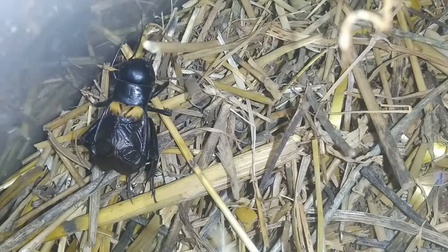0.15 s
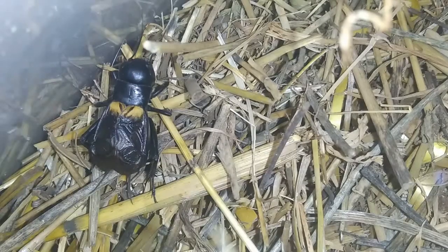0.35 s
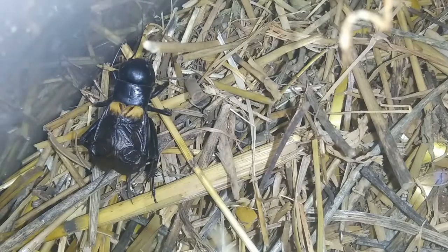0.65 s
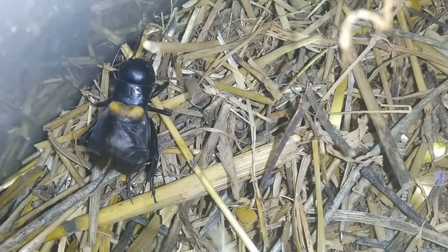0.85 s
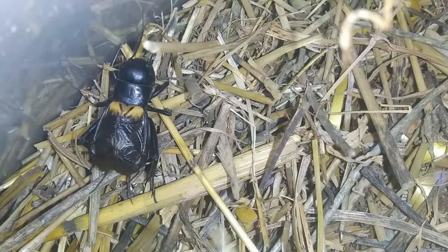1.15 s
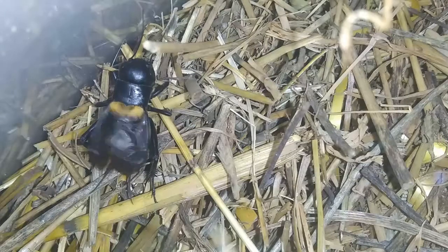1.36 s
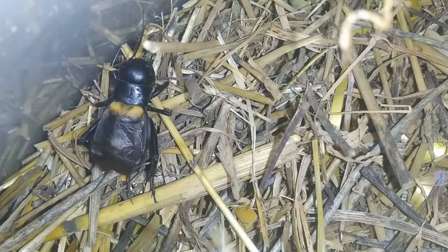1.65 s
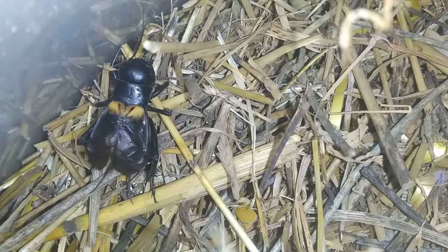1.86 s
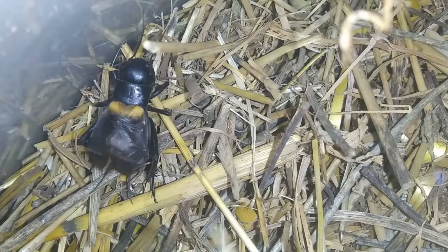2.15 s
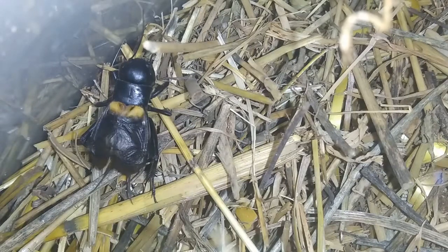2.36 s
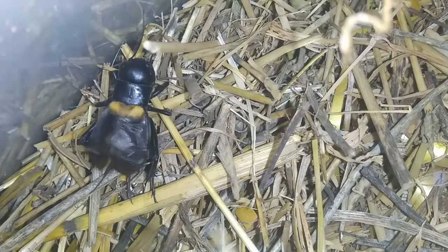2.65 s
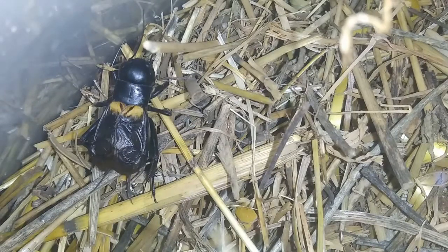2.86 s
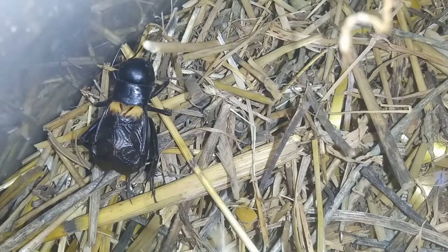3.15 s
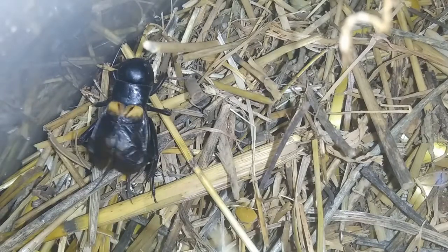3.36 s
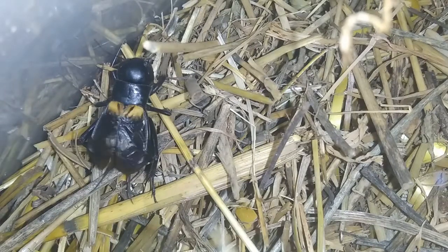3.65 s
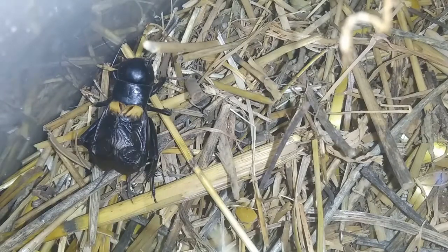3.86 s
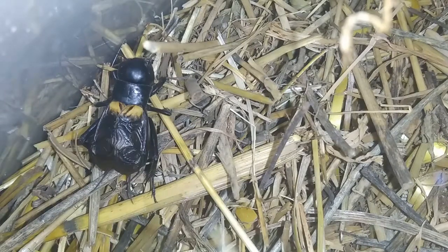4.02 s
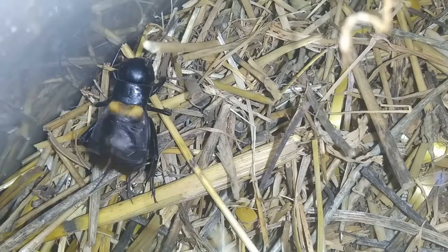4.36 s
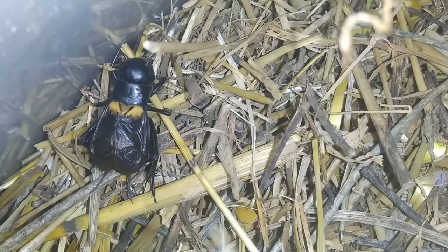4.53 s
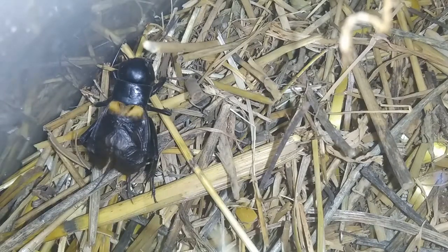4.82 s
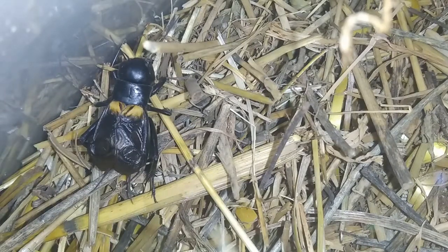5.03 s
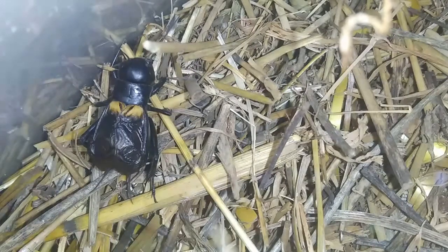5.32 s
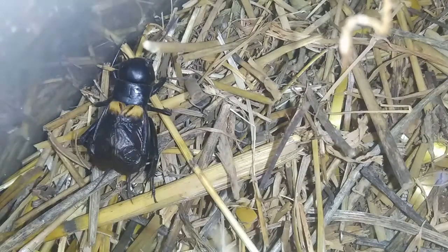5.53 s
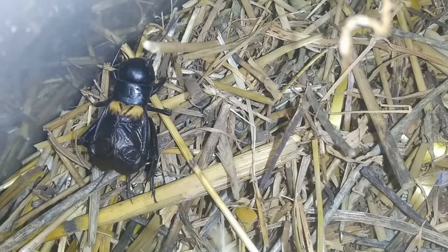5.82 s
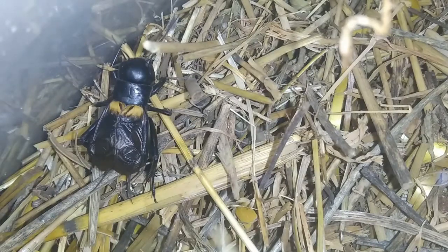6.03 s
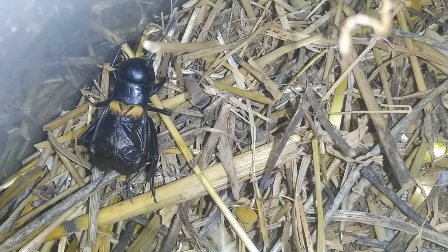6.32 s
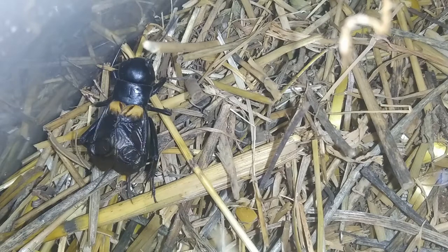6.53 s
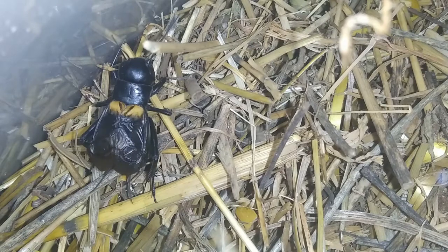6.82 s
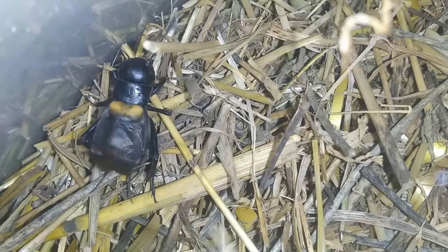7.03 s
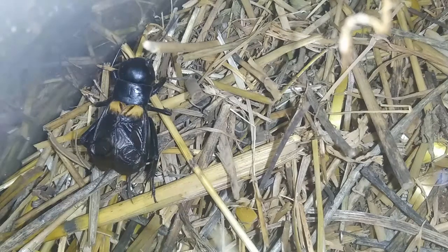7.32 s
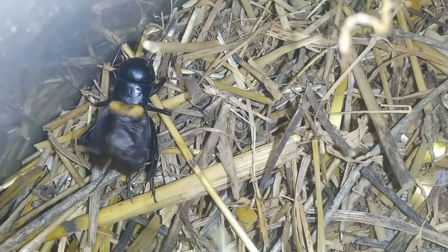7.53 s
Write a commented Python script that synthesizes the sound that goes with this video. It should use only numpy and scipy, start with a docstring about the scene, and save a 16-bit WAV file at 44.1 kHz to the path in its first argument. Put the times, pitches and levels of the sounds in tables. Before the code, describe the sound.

Shrill, close cricket chirps repeat steadily, about four a second, in a small enclosed space, faltering briefly before carrying on.

```python
"""Field cricket in a straw-lined tub

A cricket stridulates a hand's width from a phone with two microphone ports. In each chirp the wings
flick open, touch lightly, then close two or three times. At each closing a scraper crosses a toothed
file and drives the wing at resonance: a loud falling whistle whose pitch and length follow its force.
Faint dull noise swells with each chirp, straw ticks now and then, and the room answers briefly.
The near port overloads, and a fast limiter flattens the strokes."""
import sys
import numpy as np
from scipy import signal
from scipy.fft import rfft, irfft
from scipy.io import wavfile
from scipy.ndimage import uniform_filter1d

SR = 44100
rng = np.random.default_rng(int(sys.argv[2]) if len(sys.argv) > 2 else 0)


def write(x):
    x = np.atleast_2d(x).T
    wavfile.write(sys.argv[1], SR, np.round(np.clip(x, -1, 1) * 32767).astype(np.int16))

N = 338688


def undb(db):
    """Decibels as an amplitude ratio."""
    return 10 ** (np.asarray(db) / 20)


def add(track, s, sound):
    """Superposition: a sound adds to a track from s seconds on."""
    start = max(int(s * SR), 0)
    part = sound[..., :max(N - start, 0)]
    track[..., start:start + part.shape[-1]] += part


def noise(points):
    """Spectral shaping: two independent noises of rms 1, coloured by (Hz, dB) points."""
    hz, db = np.transpose(points)
    bins = np.maximum(np.arange(N // 2 + 1) * SR / N, 1)
    gain = undb(np.interp(np.log(bins), np.log(hz), db))
    shaped = irfft(rfft(rng.standard_normal((2, N))) * gain, N)
    return shaped / shaped.std()


def wobble(t, rate):
    """Random modulation: values drawn rate times a second and joined by lines."""
    return np.interp(t * rate, np.arange(256), rng.standard_normal(256))


def band(x, low_hz, high_hz):
    """Zero-phase filtering: a steep band-pass run forwards and backwards."""
    return signal.sosfiltfilt(signal.butter(4, [low_hz, high_hz + 1], "band", fs=SR, output="sos"), x)


def ports(left_db):
    """Level difference between the two ports; the right one faces the cricket."""
    return np.array([[undb(left_db)], [1]])


# Spectrum of wing rubbing on wing, teeth out of step. Each row: frequency in Hz, relative level in dB.
SCRAPE_SPECTRUM = [(1000, -35), (2900, -43.5), (3700, -18.5), (4500, -2.5), (5200, 3.5), (6300, -10.5),
                   (7200, -6), (8100, -24), (9500, -22), (12000, -19.5), (15500, -43)]
# The song. Each row, one chirp: start, run-up to the first full stroke and wing period in seconds;
# number of full strokes; relative levels in dB of the first stroke, the last stroke, the first touch,
# the first stroke's scrape and the later strokes' scrape.
CHIRPS = [(.022, .049, .0338, 2, .2, .6, -4.4, -24, -39), (.342, .0383, .0343, 2, .3, -.2, -8.5, -41, -32),
          (.600, .0435, .036, 2, 1, 3.1, -5.5, -34, -42), (.915, .041, .0365, 2, 1.3, 3.3, -30, -44, -30),
          (1.128, .046, .0423, 2, 1.2, 3.3, -3.5, -32, -39),
          (1.425, .043, .035, 2, 1.2, 3.3, -25, -30, -30),
          (1.675, .0423, .038, 2, 1.4, 3.2, -5.5, -37, -33),
          (1.948, .0417, .038, 2, 1.7, 3.6, -28, -47, -25), (2.199, .044, .0373, 2, .3, 4.5, -6, -28, -37),
          (2.482, .0407, .0354, 2, 1.7, 3.5, -32, -44, -24),
          (2.726, .0453, .0332, 3, 2.3, 5.8, -24, -29, -25),
          (3.115, .039, .0313, 2, -1.5, 0, -28, -44, -31), (3.453, .0413, .0337, 2, -1, .6, -5.5, -29, -26),
          (3.757, .0367, .0332, 3, .5, 3, -27, -28, -27), (4.216, .0426, .0313, 2, -.8, 3.7, -26, -26, -29),
          (4.433, .0444, .0354, 2, 1.4, 3.6, -25, -29, -31),
          (4.717, .040, .0335, 2, 1.7, 3.5, -27, -34, -28),
          (4.947, .0444, .0378, 2, 3.1, 4.6, -26, -31, -22), (5.215, .0415, .0378, 2, 2, 4, -28, -33, -23),
          (5.463, .040, .0374, 2, 2.3, 4.6, -25, -34, -25), (5.718, .039, .035, 2, 3.5, 4.8, -26, -42, -30),
          (5.986, .0403, .037, 2, 3.4, 4.7, -26, -40, -27),
          (6.263, .0407, .0334, 2, 3.4, 4.8, -27, -41, -30),
          (6.505, .041, .0343, 2, 3.5, 4.9, -26, -25, -30), (6.779, .039, .0354, 2, 3.7, 5, -25, -44, -32),
          (7.045, .040, .033, 2, 3.9, 5.4, -28, -44, -31), (7.305, .0447, .031, 2, 3.5, 5.6, -22, -20, -28),
          (7.589, .0385, .0334, 2, 3.9, 6.8, -27, -44, -31)]


def wing_flicks(wing_hz=4400, sag_hz=400, ring_s=.0051, start_hz=4500, end_hz=13500, flick_db=-37):
    """Impulse excitation: the jolted wing rings and sags as the file slips back in a rising zip."""
    tones, friction = np.zeros(N), np.zeros(N)
    t = np.arange(SR // 50) / SR
    rise = 1 - np.exp(-(t / .0008) ** 2)
    fade = rise * np.exp(-(t / ring_s) ** 2)
    share = np.minimum(t / .0055, 1)
    ring = np.sin(2 * np.pi * np.cumsum(wing_hz - sag_hz * share) / SR)
    for s, *_ in CHIRPS:
        teeth_hz = start_hz + (end_hz - start_hz) * share + 500 * wobble(t, 2200)
        sweep = np.sin(np.pi * share) * np.sin(2 * np.pi * np.cumsum(teeth_hz) / SR)
        add(tones, s, undb(flick_db) * fade * (ring + undb(-11) * sweep))
        add(friction, s, undb(flick_db - 9) * fade)
    return ports(-22.5) * (tones + friction * noise(SCRAPE_SPECTRUM))


LOCK_DB = -16  # a first touch above this locks into a short whistle; a lighter one only brushes
USUAL_SCRAPE_DB = -32  # a louder scrape marks a hurried stroke: shorter, with a deeper fall


def stroke_plan(stroke_s=.0208, force_s_per_db=.0006, hurry_s_per_db=.00006):
    """Force sets duration: yields start and length in seconds, then right, left and scrape dB."""
    # the left port hears a chirp's first whistle weakly and the later ones at a steady level
    left_offset_db, left_later_db = -14.1, -8
    for s, run_up, period, count, first_db, last_db, touch_db, first_scrape, later_scrape in CHIRPS:
        locked = touch_db > LOCK_DB
        if locked:
            length = max(.021 + .0017 * touch_db, .004)
            yield s + .0185, length, touch_db, touch_db + left_offset_db, -37
        for k, right_db in enumerate(np.linspace(first_db, last_db, round(count))):
            left_db = left_later_db if k or locked else right_db + left_offset_db
            scrape_db = later_scrape if k else first_scrape
            hurry_db = scrape_db - USUAL_SCRAPE_DB
            length = stroke_s + force_s_per_db * right_db - hurry_s_per_db * hurry_db
            yield s + run_up + k * period, length, right_db, left_db, scrape_db


def rough_overtone(t, phase):
    """Amplitude and phase modulation: uneven teeth make an overtone rough."""
    return (1 + .35 * wobble(t, 600)) * np.sin(phase + .35 * wobble(t, 900))


# Envelope of a stroke. Each row: share of its length, relative amplitude at the left and right ports.
STROKE_ENVELOPE = [(0, .02, 0), (.09, .17, .33), (.23, .48, .68), (.41, .85, .92), (.56, 1, 1),
                   (.68, .92, .7), (.79, .78, .45), (.91, .25, .14), (1.12, .06, .04)]


def whistle(length, hz, fall_hz, right_db, left_db, jitter_hz=16, slip_hz=220, port_lag_s=.00055):
    """Forced vibration: one tooth passes per wing cycle, so the pitch falls as the scraper slows."""
    t = np.arange(int(1.12 * length * SR)) / SR
    share = t / length
    pitch = hz - fall_hz * share ** 3.1 + jitter_hz * wobble(t, 900)
    pitch += slip_hz * np.exp(-t / .0009)  # the scraper runs fast until the resonance holds it
    phase = 2 * np.pi * (np.cumsum(pitch) / SR - pitch * np.array([[port_lag_s], [0]]))
    at, *sides = np.transpose(STROKE_ENVELOPE)
    left, right = (np.interp(share, at, side) for side in sides)
    right = right ** (.8 + .06 * max(right_db, 0))  # harder strokes surge more in the middle
    swell = np.array([undb(left_db) * left, undb(right_db) * right])
    swell = uniform_filter1d(swell, size=30, mode="constant") * undb(.4 * wobble(t, 380))
    # the wing starts from rest and rings out once the scraper leaves the file
    taper = np.clip(np.minimum(t / .0008, (1.12 - share) / .2), 0, 1)
    swell *= np.sin(np.pi / 2 * taper) ** 2
    brightness = undb(1.5 * rng.standard_normal(2))
    second = brightness[0] * undb([[-32], [-35]]) * rough_overtone(t, 2 * phase)
    third = brightness[1] * undb([[-48], [-45]]) * rough_overtone(t, 3 * phase)
    fundamental = (1 + .028 * wobble(t, 1500)) * np.sin(phase)
    return swell * (fundamental + second + third), swell[1]


def wing_strokes(wing_hz=4672, in_tune_db=2.5, flat_hz_per_db=19, catch_s=.0024, rasp_db=-34):
    """Resonance: the teeth scrape until they lock to the wing's mode; weak strokes sing flat."""
    song, friction, effort = np.zeros((2, N)), np.zeros(N), np.zeros(N)
    t = np.arange(SR // 50) / SR - .01
    catch = np.exp(-(t / catch_s) ** 2)
    for s, length, right_db, left_db, scrape_db in stroke_plan():
        hz = wing_hz - flat_hz_per_db * max(in_tune_db - right_db, 0)
        fall_hz = 540 + 12 * right_db + 4 * (scrape_db - USUAL_SCRAPE_DB)  # force and hurry deepen it
        tone, swell = whistle(length, hz, fall_hz, right_db, left_db)
        add(song, s, tone)
        add(effort, s, swell)
        add(friction, s + .0002 + t[0], undb(scrape_db + 5.5) * catch)
    scrape = ports(-9.5) * noise(SCRAPE_SPECTRUM) * (friction + undb(rasp_db) * effort)
    return song + scrape, effort


# Spectrum of the dull background noise. Each row: frequency in Hz, relative level in dB.
BACKGROUND_SPECTRUM = [(25, -15.5), (60, -16), (120, 1.5), (220, -.5), (400, -4.5), (800, -10),
                       (2000, -9.5), (4000, -31)]


def background(effort, settle_hz=5, direct_db=-57, linger_db=-55, floor_db=-89):
    """Amplitude modulation: faint dull noise swells with each chirp, lingers, then sinks."""
    linger = signal.sosfilt(signal.butter(1, settle_hz, fs=SR, output="sos"), effort)
    envelope = undb(direct_db) * effort + undb(linger_db) * linger + undb(floor_db)
    return ports(-10.5) * noise(BACKGROUND_SPECTRUM) * envelope


# Reflections from tub and room, left port then right. Each row: build-up in seconds,
# level per 20 ms in dB, time to decay by 60 dB in seconds.
REFLECTIONS = [(.003, -16, .105), (.013, -25, .13)]


def room(x, wall_s=.05, wall_db=-35, slap_s=.008):
    """Reverberation: the tub rings at the left port, and the walls return later at the right."""
    t = np.arange(SR // 5) / SR
    fade = np.array([np.minimum(t / build, 1) * undb(db - 60 * np.maximum(t - build, 0) / t60)
                     for build, db, t60 in REFLECTIONS])
    fade[1] += undb(wall_db) * np.exp(-((t - wall_s) / slap_s) ** 2)  # one late slap from a wall
    response = (t > .003) * fade * rng.standard_normal(fade.shape) / np.sqrt(SR / 50)
    # the overtones beam past the phone and come back stronger
    beam = undb(9) * band(x, 8400, 9800) + undb(-1) * band(x, 12900, 14200)
    tub = undb(-4) * band(x, 3400, 4250)  # the tub favours the low end of each glide
    return signal.fftconvolve((x + beam + tub)[None], response, axes=1)[:, :N]


# Faint ticks of straw. Each row: start in seconds, frequency in Hz, level in dB.
STRAW_TICKS = [(.175, 1070, -55.5), (4.947, 1097, -47), (5.493, 1590, -43)]


def straw_ticks(ring_s=.004, spread_hz=90):
    """Damped vibration: a shifting stalk gives a short, rough ring."""
    ticks = np.zeros(N)
    t = np.arange(SR // 20) / SR
    fade = (1 - np.exp(-t / .00059)) * np.exp(-t / ring_s)
    for s, hz, db in STRAW_TICKS:
        pitch = hz + spread_hz * wobble(t, 800)
        add(ticks, s, undb(db) * fade * np.sin(2 * np.pi * np.cumsum(pitch) / SR))
    return ports(-7.5) * ticks


# A stroke that misses the file and only brushes. Each row: time in seconds, ring in Hz, level in dB.
SLIPS = [(3.227, 4480, -28), (3.24, 4450, -22)]


def light_touches(wing_hz=4480, rebound_s=.0068, rebound_db=-9):
    """Rebound: each light touch lands twice. Yields (seconds, Hz, dB) for these, then the slips."""
    for s, run_up, _, _, _, _, touch_db, *_ in CHIRPS:
        if touch_db <= LOCK_DB:
            contact = s + .53 * run_up
            yield contact, wing_hz, touch_db
            yield contact + rebound_s, wing_hz, touch_db + rebound_db
    yield from SLIPS


def wing_brushes(width_s=.0028, scrape_db=-9.5):
    """Frictional excitation: a touch too light to lock gives a short falling ring inside a scrape."""
    rings, friction = np.zeros(N), np.zeros(N)
    t = np.arange(SR // 50) / SR - .01
    swell = np.exp(-(t / width_s) ** 2)
    for s, wing_hz, db in light_touches():
        pitch = wing_hz - 450 * np.tanh(t / .004) + 180 * wobble(t, 1200)
        add(rings, s + t[0], undb(db) * swell * np.sin(2 * np.pi * np.cumsum(pitch) / SR))
        add(friction, s + t[0], undb(db + scrape_db) * swell)
    return ports(-19) * (rings + friction * noise(SCRAPE_SPECTRUM))


def scene():
    """Superposition: the direct sound of cricket and straw adds to its reflections and faint noise."""
    song, effort = wing_strokes()
    direct = song + wing_flicks() + wing_brushes() + straw_ticks()
    return direct + room(direct[1]) + background(effort)


# Spectrum of an overloaded port's sputter. Each row: frequency in Hz, relative level in dB.
SPUTTER_SPECTRUM = [(25, -11), (60, -15), (130, 5.5), (420, 4.5), (750, 0), (1200, -11), (1850, -5),
                    (3000, -11), (5500, -6), (8000, -10), (12000, -16), (15500, -16)]


def overload(x, ceiling=1.13, rate_hz=16000, smooth_hz=8500, sputter_db=-19.5):
    """Aliasing: low-rate clipping folds overtones into a rising squeak near 2 kHz, over a sputter."""
    slow = signal.resample_poly(x, rate_hz, SR)
    excess = slow - np.clip(slow, -ceiling, ceiling)
    excess = np.interp(np.arange(N) / SR, np.arange(len(slow)) / rate_hz, excess)
    depth = np.sqrt(np.abs(uniform_filter1d(np.abs(excess), size=60)))
    folded = x - signal.sosfiltfilt(signal.butter(2, smooth_hz, fs=SR, output="sos"), excess)
    return folded + undb(sputter_db) * depth * noise(SPUTTER_SPECTRUM)[0]


def limiter(x, top=.645, knee=5.4):
    """Dynamic compression: the gain falls along a soft knee as the fast envelope rises."""
    power = uniform_filter1d(uniform_filter1d(x ** 2, size=29), size=19)
    envelope = np.sqrt(2 * np.abs(power))
    return x / (1 + (envelope / top) ** knee) ** (1 / knee)


def record(dry):
    """Nonlinear transduction: each port overloads and is limited on its own, then cut at 15.8 kHz."""
    held = np.array([limiter(overload(port)) for port in dry])
    return signal.sosfilt(signal.ellip(10, .2, 90, 15800, fs=SR, output="sos"), held)


dry = scene()
out = record(dry)
write(out)
```